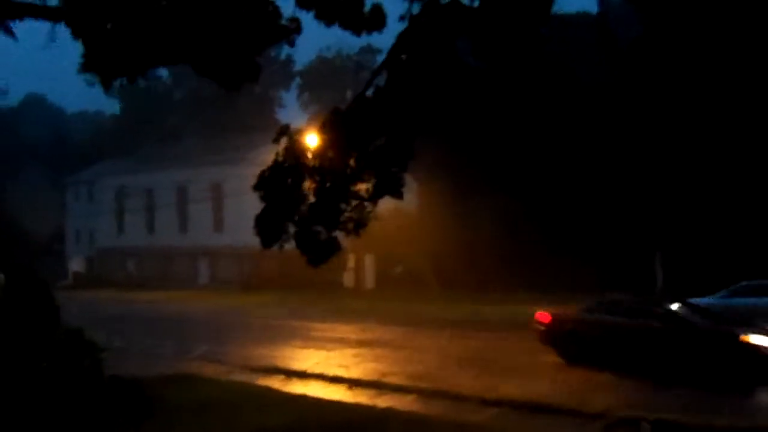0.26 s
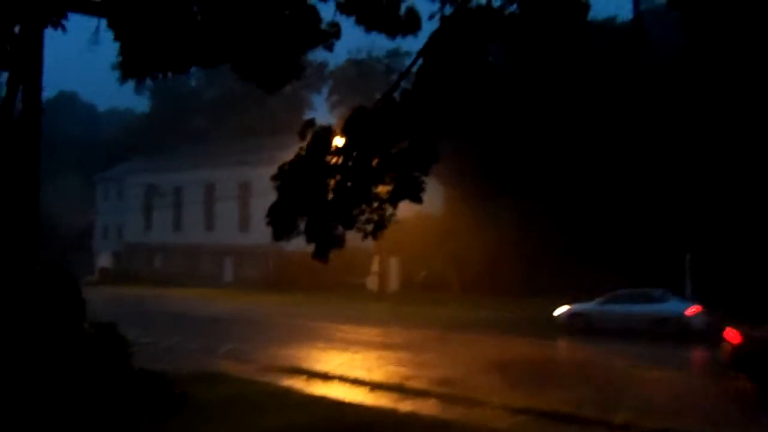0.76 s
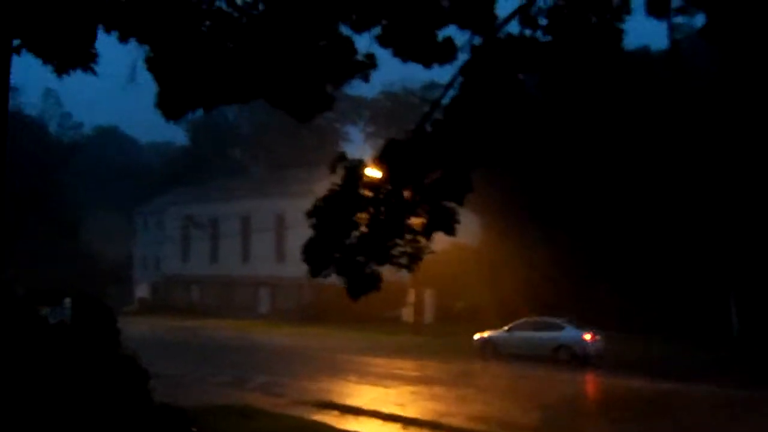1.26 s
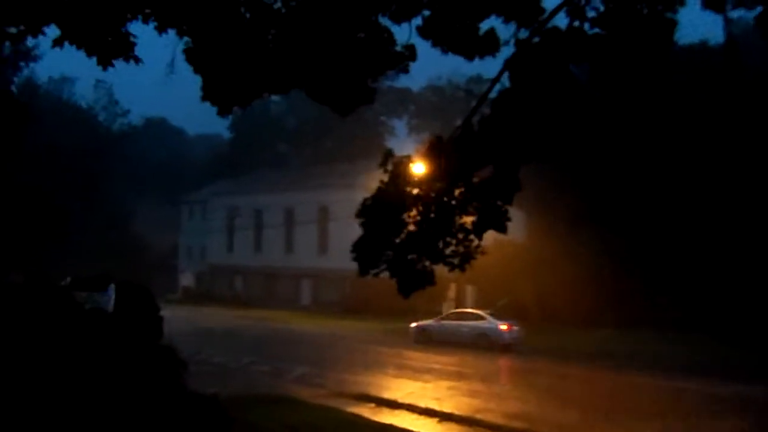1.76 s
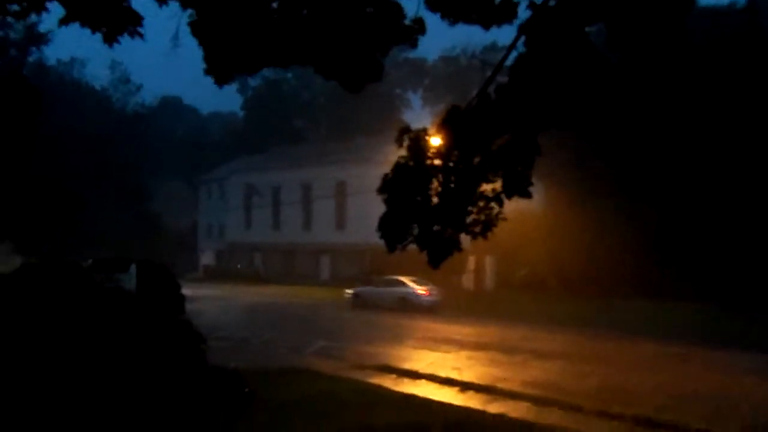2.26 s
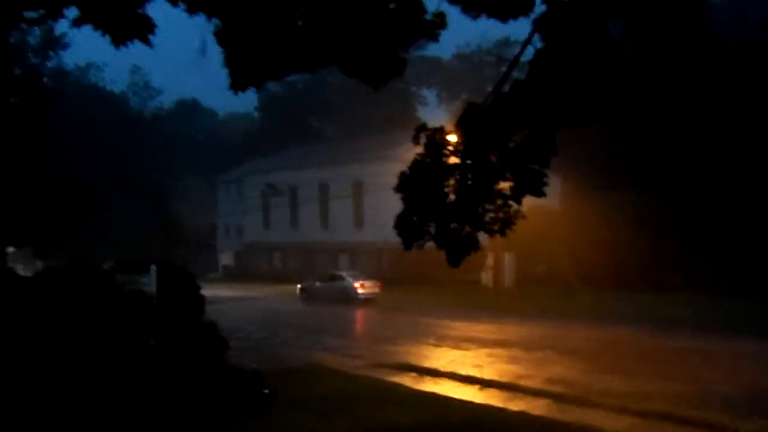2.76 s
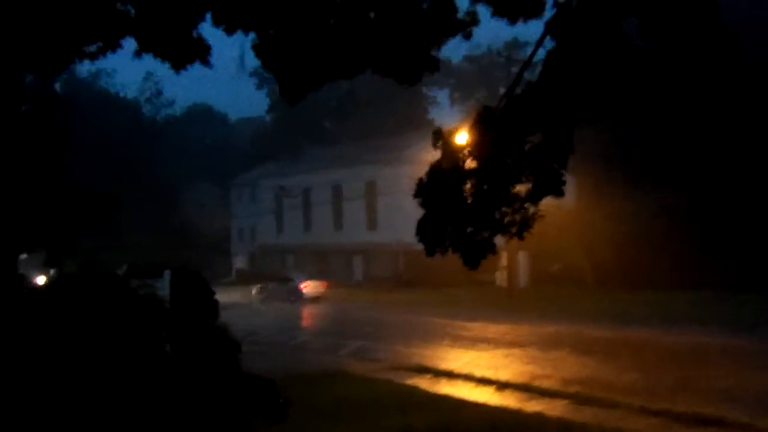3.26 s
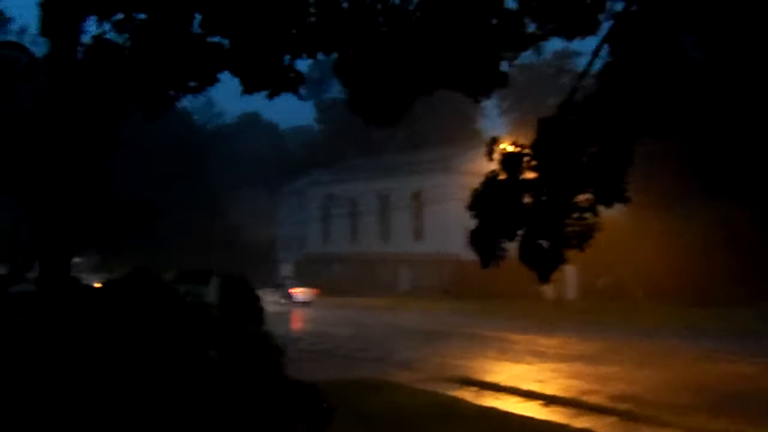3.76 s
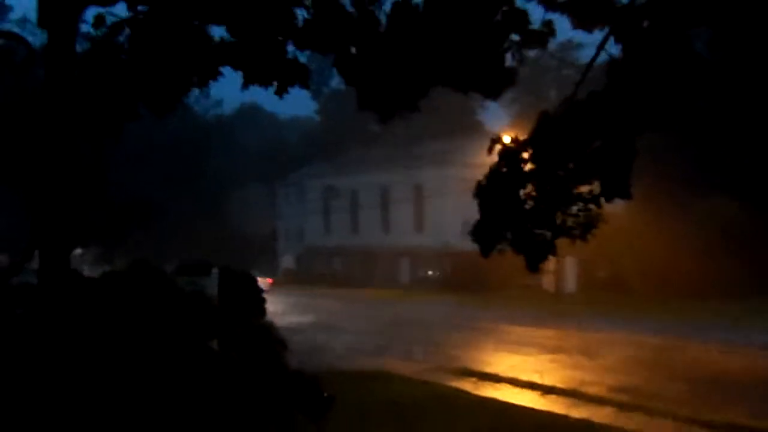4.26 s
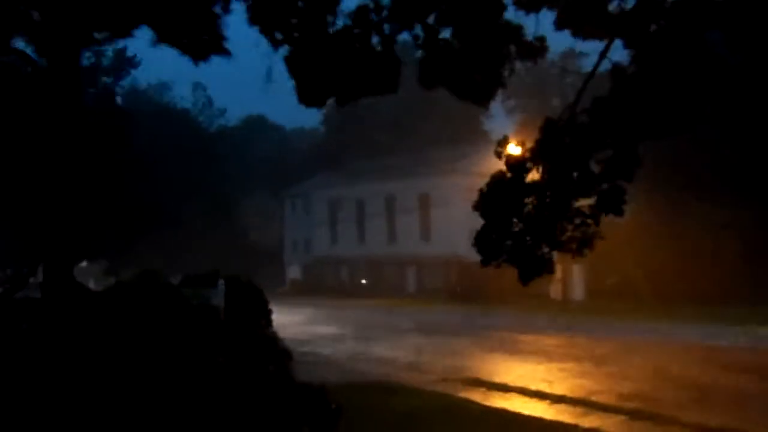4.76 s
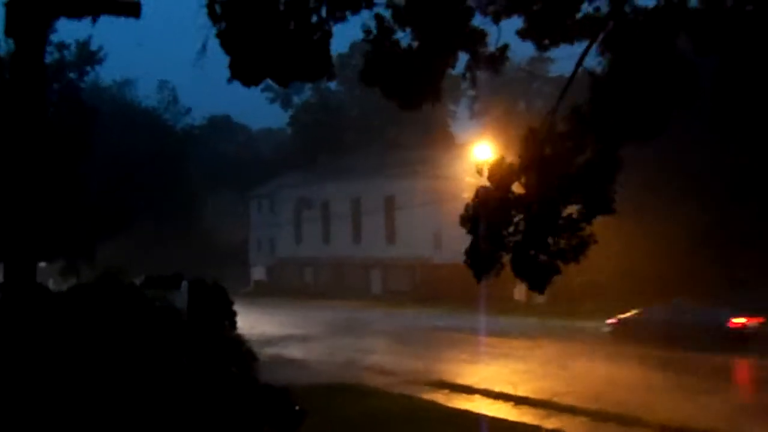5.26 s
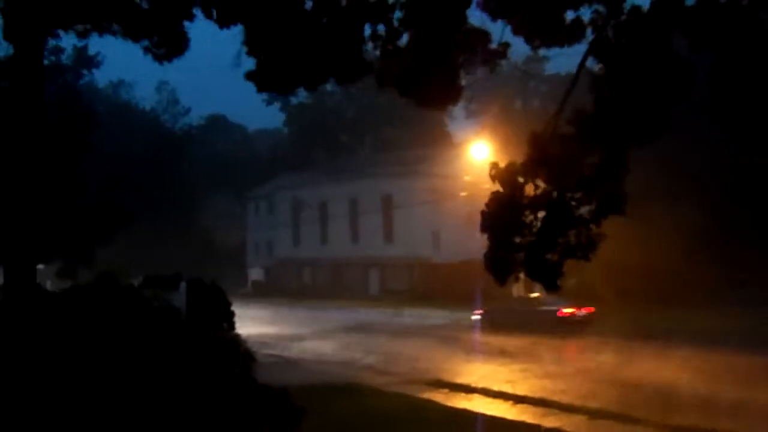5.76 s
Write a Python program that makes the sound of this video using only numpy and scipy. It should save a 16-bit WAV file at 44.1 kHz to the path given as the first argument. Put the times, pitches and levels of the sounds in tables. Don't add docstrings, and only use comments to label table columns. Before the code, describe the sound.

Outdoors on a street at dusk, dense heavy rain and a blended hiss of tyres on wet road run throughout. Thunder rolls in low, uneven thumps for the first seconds, nearly settles, then bursts into a very loud, crackling cluster of booms. The small microphone overloads on its crests and its automatic gain pushes the rain down, leaving quieter rain and fading rumbles.

```python
import sys
import numpy as np
from scipy import signal
from scipy.fft import rfft, irfft, next_fast_len
from scipy.io import wavfile
from scipy.ndimage import uniform_filter1d, map_coordinates

SR = 44100
rng = np.random.default_rng(int(sys.argv[2]) if len(sys.argv) > 2 else 0)


def volts_from_db(level):
    exponent = np.asarray(level, float) / 20
    return 10 ** exponent


def unload_wav(signal):
    wavfile.write(
        sys.argv[1],
        SR,
        np.round(np.clip(np.atleast_2d(signal).T, -1, 1) * 32767).astype(np.int16),
    )


N = 265041

# t/s, peak level/dB, f/Hz
BOOM_EVENTS = [(.623, -27, 202), (.69, -23, 158), (.875, -28, 201), (.904, -33, 182), (1.393, -23.5, 140),
               (1.665, -29, 110), (2.145, -18, 142), (2.197, -23, 156), (2.626, -26, 139), (3.52, -27, 151),
               (3.741, -27, 203), (4.345, -32, 179), (4.387, -14, 254), (4.437, -23, 177), (4.49, -23, 203),
               (4.547, -12, 204), (4.719, -17, 224), (4.773, -9.5, 210), (4.846, -6.5, 253),
               (4.895, -8, 232), (5.42, -24, 203), (4.926, -21, 104), (4.96, -13.5, 254),
               (5.04, -24.5, 225), (5.175, -20.5, 153), (5.248, -32, 320), (5.37, -21, 177),
               (5.68, -22, 114), (5.988, -20, 113), (6, -19, 226)]
# t/s, peak level/dB, length/ms
THUD_EVENTS = [(.695, -21, 50), (.93, -23.5, 72), (1.03, -21.5, 41), (1.131, -19.5, 43), (1.307, -17, 100),
               (1.591, -30, 90), (1.788, -31.5, 90), (2.152, -27.5, 44), (2.224, -25, 39), (2.277, -32, 90),
               (3.736, -28, 64), (4.4, -14.5, 110), (4.576, -18, 90), (4.914, -12, 22), (4.972, -11.5, 19),
               (5.419, -30.5, 71), (5.6, -28.5, 99), (5.952, -33.5, 91)]
# crest t/s, level/dB, fading/(dB/s), deep register over body/dB
PEAL_EVENTS = [(.57, -33, 4, 1.5), (.66, -31.5, 16, -1), (.82, -35.5, 38, 1), (.93, -37, 16, 7),
               (1.29, -26, 30, -4), (1.39, -29.5, 27, -4), (1.62, -41, 16, 1), (2.08, -30, 23, -14),
               (2.14, -23, 66, -5), (2.2, -29, 33, 0), (2.4, -32.5, 1, -3), (3.4, -32.5, 6, -10),
               (2.97, -35.5, 57, -0.5), (4.34, -16.5, 62, -5), (4.39, -20.5, 60, -15),
               (4.45, -18.5, 60, -19), (4.54, -18.5, 200, -7), (4.63, -24.5, 11, -0.5),
               (4.725, -22, 90, -5), (4.84, -20.5, 100, -0.5), (4.905, -17, 48, -2.5), (4.96, -25.5, 92, 2),
               (5.06, -36, 4, -2), (5.19, -27.5, 70, -14), (5.25, -39, 40, -9), (5.37, -26, 109, -13),
               (5.67, -33, 50, -4), (5.79, -33, 60, -2), (5.86, -33.5, 60, -5), (6.0, -29, 37, -4)]
# f/Hz, density level/dB
DEEP_SPECTRUM = [(12, -40), (28, -10), (45, -6.5), (70, -5.5), (95, -8), (130, -13.5), (300, -49.5)]
BODY_SPECTRUM = [(50, -24), (100, -8.5), (140, -1), (200, 0), (260, -4.5), (340, -8.5), (450, -20),
                 (900, -64)]
CRACKLE_SPECTRUM = [(200, -14), (350, -1.5), (500, -1), (750, -8), (1100, -15.5), (2000, -48)]
# t/s, rain level/dB, tyre hiss over rain/dB
DOWNPOUR_CURVE = [(0, -33.5, -1.5), (.2, -33.5, -2.5), (.3, -34.5, -1.5), (.95, -36, -0.5),
                  (1.4, -35.5, -0.5), (2.0, -34.5, 0), (2.7, -33, -1), (3.2, -32.5, -1), (3.5, -32, -1.5),
                  (3.65, -31.5, -0.5), (3.9, -31, -2.5), (4.1, -31, -1), (4.32, -31.5, -1), (4.78, -30, -1),
                  (4.89, -31, -1), (5.1, -31.5, -2), (6.01, -31.5, -1.5)]
# t/s, patter over splash level/dB
PATTER_BALANCE = [
    (0, 0.5),
    (1.0, 1.5),
    (1.5, 0),
    (3.1, -1),
    (3.52, -2.5),
    (3.68, 1.5),
    (3.9, 2.5),
    (4.4, 2),
    (5.0, 2),
    (6.01, 2.5),
]
# f/Hz, density level/dB
PATTER_SPECTRUM = [(500, -33), (1200, -19), (2100, -2), (2650, -1.5), (3100, -0.1), (3600, -1.5),
                   (4300, -6.5), (6000, -14.5), (10000, -48)]
SPLASH_SPECTRUM = [(2000, -21), (3600, -2.5), (4500, -1), (6000, -1.5), (7200, -4.5), (9000, -13),
                   (14000, -34)]
SPRAY_SPECTRUM = [(4000, -32), (6500, -6.5), (8000, -1), (10000, -0.5), (12000, -2), (14000, -3.5)]
ROAD_SPECTRUM = [(100, -15), (400, -8), (800, -2), (1300, -1), (1900, -1), (2400, -7.5), (4000, -14),
                 (9000, -54)]
SIDE_PATCH_S = [.008, .05, .17, .309, .89, 1.006, 1.145, 1.82, 1.911, 2.12, 2.352, 3.142, 3.188, 5.162,
                5.278, 5.301, 5.371, 5.419, 5.51, 5.697, 5.72, 5.859]

STREET_HZ = 71
RISE_DB_PER_S = 289
MURMUR_DB, MURMUR_DEPTH_DB = -40.5, -3.5
DUCK_FROM_S, DUCK_DB_PER_S, DUCK_DB = 4.307, 16, 11.5


def unit(x):
    return x / np.sqrt(np.mean(x ** 2) + 1e-20)


def curves(rows):
    s, *cols = np.transpose(rows)
    return [np.interp(np.arange(N) / SR, s, c) for c in cols]


def wobble(knots_per_s):
    knots = rng.standard_normal(int(N * knots_per_s / SR) + 4)
    return map_coordinates(knots, [np.arange(N) * knots_per_s / SR])


def coloured(x, spectrum):
    m = next_fast_len(N + 8192)
    f_hz, db = np.transpose(spectrum)
    bins_hz = np.fft.rfftfreq(m, 1 / SR)
    gain = volts_from_db(np.interp(np.log(bins_hz + 1), np.log(f_hz + 1), db))
    return unit(irfft(rfft(x, m) * gain, m)[:N])


def impacts(rate_hz, spread_db):
    chance, size, sign = rng.random((3, N))
    heights = volts_from_db(-spread_db * np.log(size + 1e-9)) * np.sign(sign - .5)
    return unit((chance < rate_hz / SR) * heights)


def booms():
    shocks = []
    for s, db, hz in BOOM_EVENTS:
        cycles = 9 * np.exp(-.028 * (db + 30.5))
        shocks.append((s, db, hz, 1000 * cycles / hz))
    shocks += [(s, db, STREET_HZ, ms) for s, db, ms in THUD_EVENTS]
    half = SR // 8
    out, t = np.zeros(N + SR), np.arange(-half, half) / SR
    for (s, db, hz, ms), phase in zip(shocks, rng.random(len(shocks))):
        swell = np.exp(-(t / (0.00062 * ms)) ** 2)
        out[round(s * SR):][:len(t)] += volts_from_db(db - 4.0) * swell * np.sin(2 * np.pi * (hz * t + phase))
    return out[half:][:N]


def peals_db(fading, deep):
    s, db, fall_db_per_s, depth_db = np.transpose(PEAL_EVENTS)[..., None]
    t = np.arange(0, N, 64) / SR
    below_crest_db = np.maximum(RISE_DB_PER_S * (s - t), fading * fall_db_per_s * (t - s))
    each_db = db + deep * depth_db - below_crest_db
    murmur_db = MURMUR_DB + deep * MURMUR_DEPTH_DB
    power = np.sum(volts_from_db(each_db) ** 2, axis=0) + volts_from_db(murmur_db) ** 2
    return np.interp(np.arange(N) / SR, t, 10 * np.log10(power))


def shock_train(rate_hz):
    return impacts(rate_hz, spread_db=0.53) + 1.16 * rng.standard_normal(N)


def evened(x, ms):
    power = np.abs(uniform_filter1d(x ** 2, size=round(ms * SR / 1000)))
    return unit(x / np.sqrt(power + 0.06))


def roll():
    deep_db = peals_db(fading=1, deep=1)
    body_db = peals_db(fading=1, deep=0)
    crackle_db = -11 - 30 + 1.265 * (peals_db(fading=1.28, deep=0) + 30)
    surge = wobble(22.077)
    deep = evened(coloured(shock_train(200), DEEP_SPECTRUM), ms=61)
    body = evened(coloured(shock_train(600), BODY_SPECTRUM), ms=51)
    crackle = evened(coloured(shock_train(1200), CRACKLE_SPECTRUM), ms=110)
    deep *= volts_from_db(deep_db - 1.84 + 0.84 * surge)
    body *= volts_from_db(body_db - 3.0 + 1.14 * surge)
    crackle *= volts_from_db(crackle_db - 2.2 + 1.7 * surge)
    return deep + body + crackle


def patchy(depth_db):
    z = signal.stft(rng.standard_normal(N + 512), nperseg=512)[2]
    field = uniform_filter1d(rng.standard_normal(z.shape), size=7, axis=0)
    field = uniform_filter1d(field, size=12, axis=1)
    return signal.istft(z * volts_from_db(depth_db * unit(field)), nperseg=512)[1][:N]


def wash(drops, spectrum, grain):
    return coloured(patchy(depth_db=0.62) + grain * drops, spectrum)


def rain():
    strength_db, tyres_db = curves(DOWNPOUR_CURVE)
    coarse_db, = curves(PATTER_BALANCE)
    fine_db = -3 + 0.47 * (strength_db + 33)
    duck_db = np.clip(DUCK_DB_PER_S * (np.arange(N) / SR - DUCK_FROM_S), 0, DUCK_DB)
    gust_db = 0.27 * wobble(9) + 0.15 * wobble(14) + 0.09 * wobble(30)
    drops = impacts(rate_hz=2500, spread_db=2.5)
    patter = volts_from_db(coarse_db / 2 + gust_db + 0.38) * wash(drops, PATTER_SPECTRUM, grain=0.16)
    splash = volts_from_db(-coarse_db / 2 + gust_db + 1.2) * wash(drops, SPLASH_SPECTRUM, grain=0.15)
    spray = volts_from_db(fine_db + 0.41 * gust_db + 2.5) * wash(drops, SPRAY_SPECTRUM, grain=0.42)
    tyres = volts_from_db(tyres_db + 0.74) * wash(drops, ROAD_SPECTRUM, grain=0.15)
    return volts_from_db(strength_db - duck_db) * (patter + splash + spray + tyres)


def scene():
    return np.tile(rain() + roll() + booms(), (2, 1))


def clipped(x):
    top, hardness = .345, 8
    return x / (1 + np.abs(x / top) ** hardness) ** (1 / hardness)


def treble_holes(x):
    hz, t, z = signal.stft(x, SR, nperseg=2048)
    power = np.abs(z) ** 2
    near_db = 10 * np.log10(np.abs(uniform_filter1d(power, size=5, axis=0)) + 1e-20)
    band_db = 10 * np.log10(np.abs(uniform_filter1d(power, size=49, axis=0)) + 1e-20)
    threshold_db = np.interp(hz, [5000, 8000, 11000, 14000], [-60, -13, -6.0, -2.0])[:, None]
    kept = (near_db > band_db + threshold_db) & (hz < 13980)[:, None]
    return signal.istft(z * kept, SR, nperseg=2048)[1][:N]


def side_patches(mid):
    low_hz, high_hz, width = 4170, 12400, .16
    hz, t, z = signal.stft(mid, SR, nperseg=512)
    edges_hz = low_hz * (high_hz / low_hz) ** rng.random((len(SIDE_PATCH_S), 2)) ** 1.3
    tiles = 0
    for s, pair in zip(SIDE_PATCH_S, edges_hz[..., None]):
        bands = np.any((hz > pair) & (hz < pair * (1 + width)), axis=0)
        tiles = tiles + np.outer(bands, np.exp(-((t - s) / 0.013) ** 4))
    level = np.sqrt(np.abs(uniform_filter1d(np.abs(z) ** 2, size=9, axis=1)))
    fresh = signal.stft(rng.standard_normal(N), SR, nperseg=512)[2]
    fresh /= np.sqrt(np.mean(np.abs(fresh) ** 2))
    return volts_from_db(-2.0) * signal.istft(tiles * level * fresh, SR, nperseg=512)[1][:N]


def low_pass(x):
    return signal.sosfilt(signal.butter(12, 15170, fs=SR, output="sos"), x)


def record(dry):
    mono = treble_holes(clipped(dry[0]))
    mix = mono + side_patches(mono) * [[1], [-1]]
    return low_pass(mix)


dry = scene()
out = record(dry)
unload_wav(out)
```